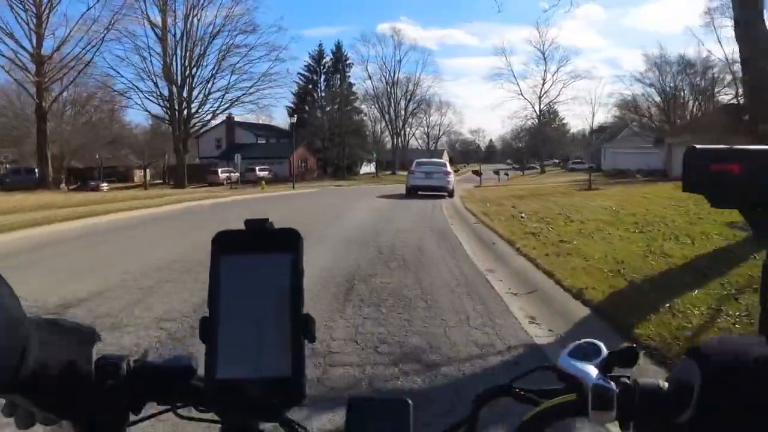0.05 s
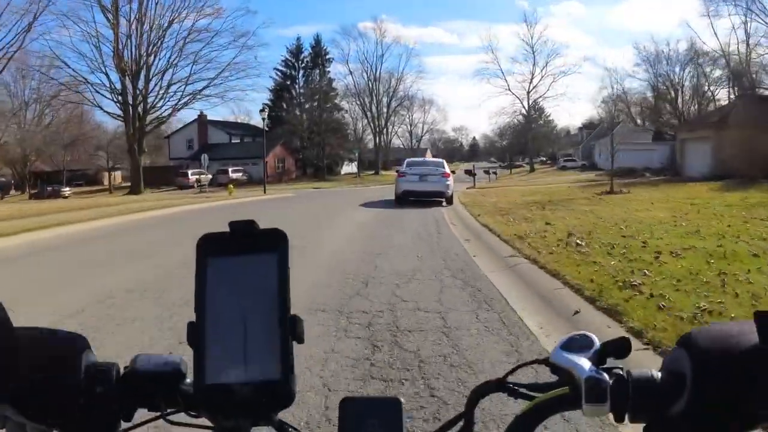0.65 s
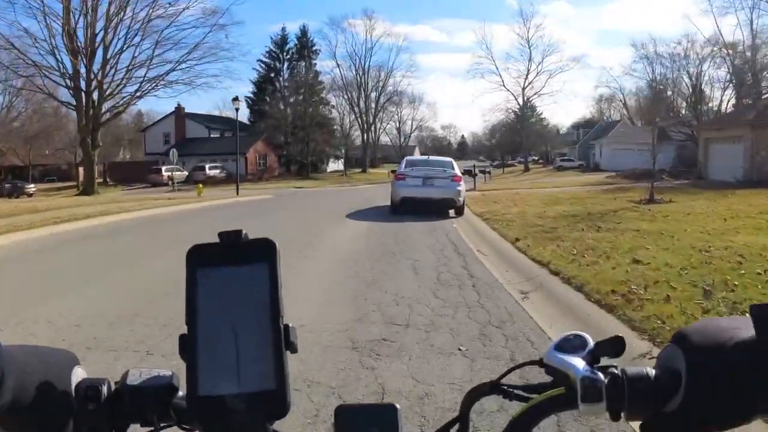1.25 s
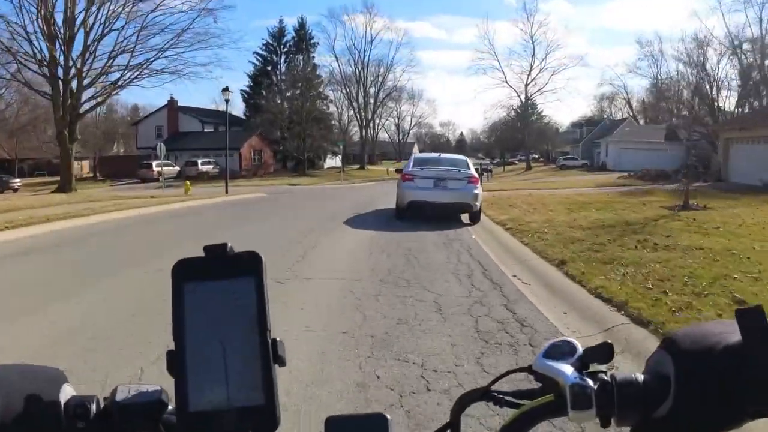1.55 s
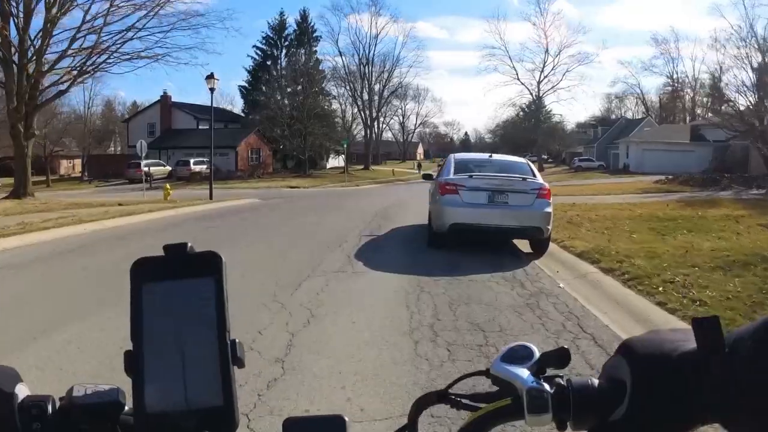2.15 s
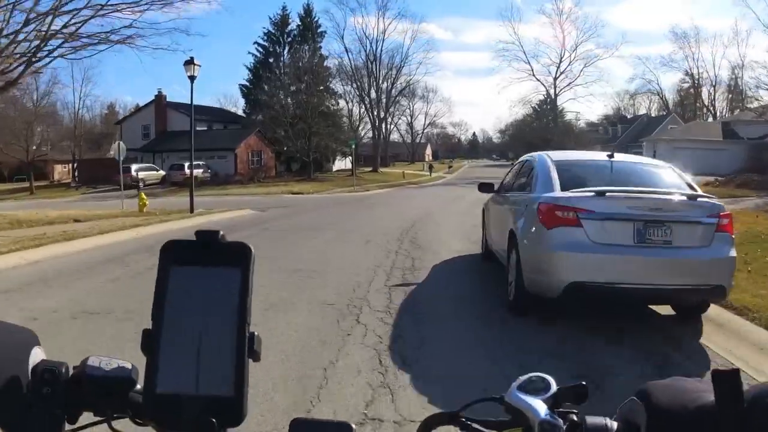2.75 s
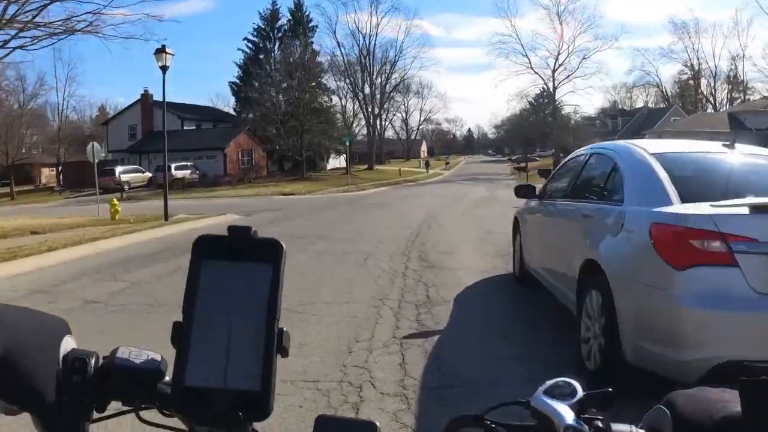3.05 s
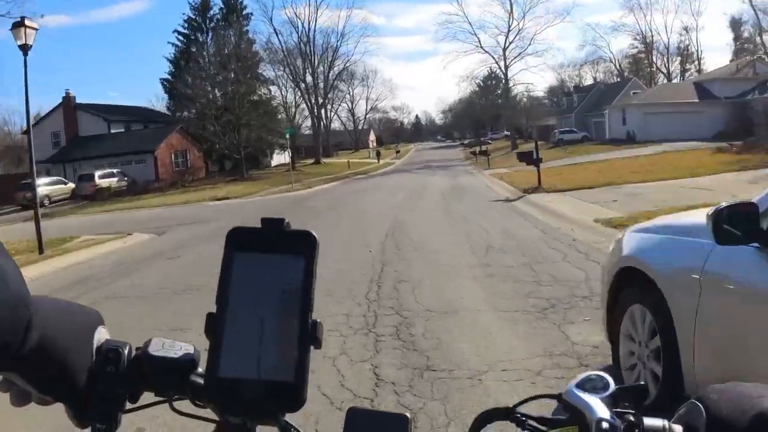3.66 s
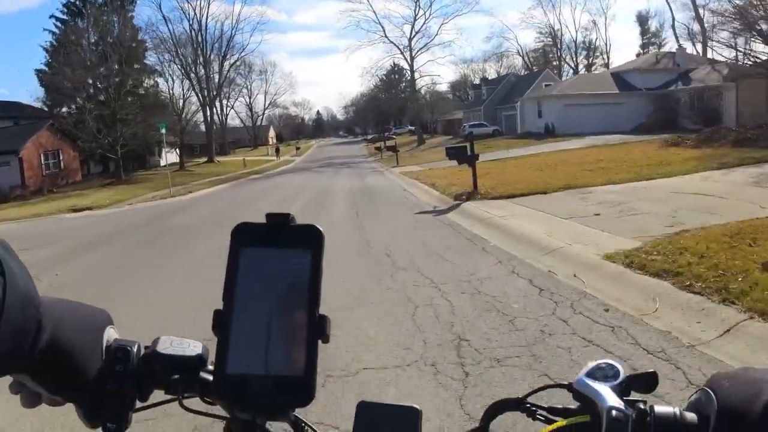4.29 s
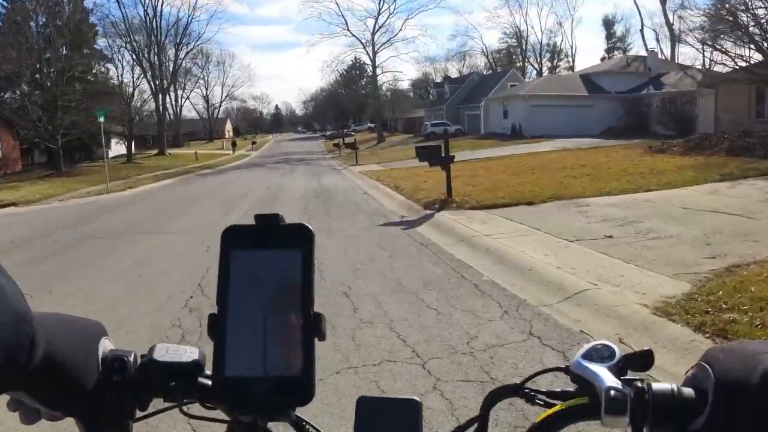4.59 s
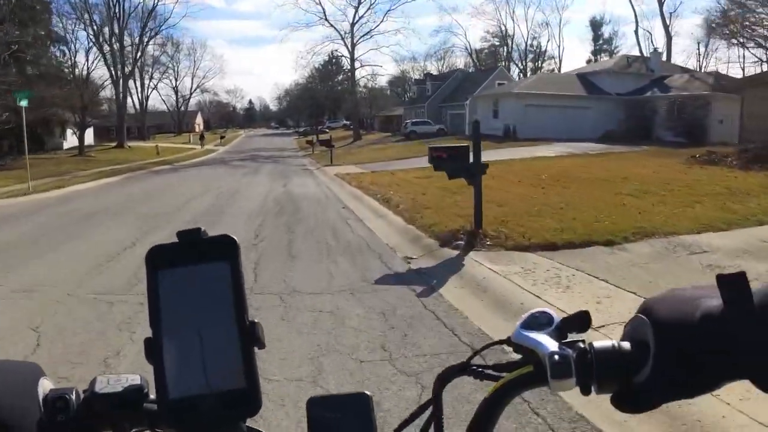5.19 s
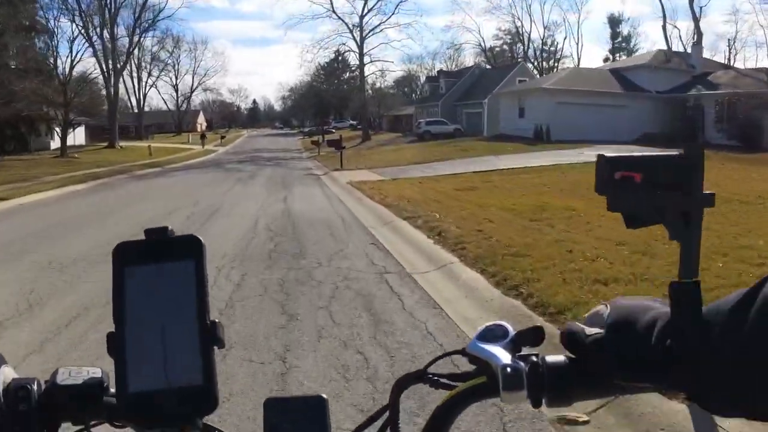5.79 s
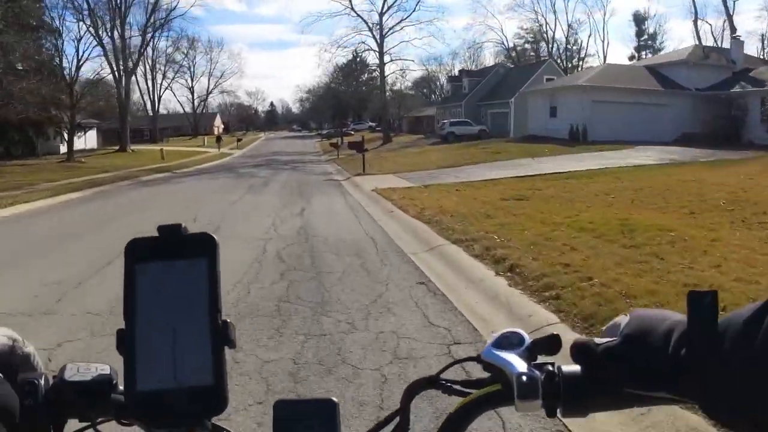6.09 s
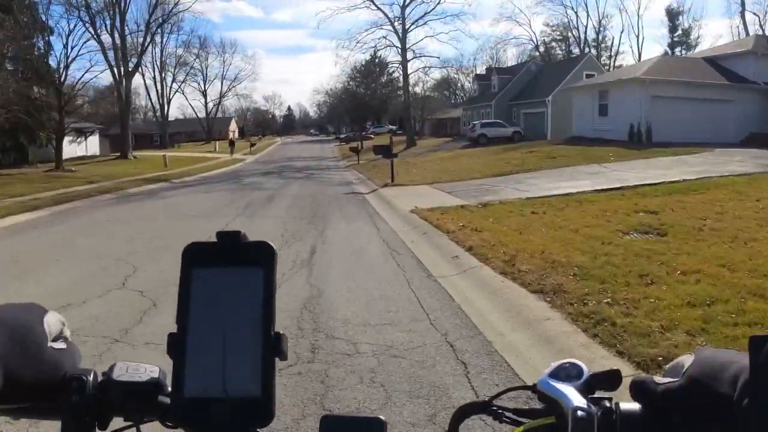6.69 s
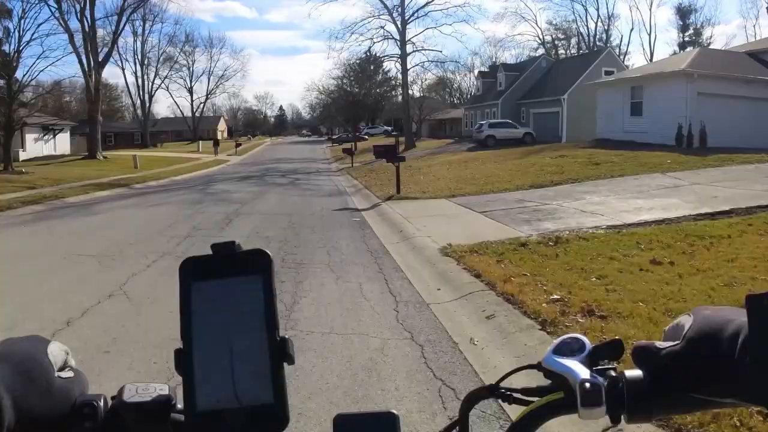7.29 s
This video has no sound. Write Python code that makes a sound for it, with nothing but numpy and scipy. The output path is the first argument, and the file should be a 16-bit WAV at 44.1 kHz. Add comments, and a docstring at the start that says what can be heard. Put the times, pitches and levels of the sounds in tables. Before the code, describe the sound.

An electric bicycle is heard from the rider's position on a street. Throughout, the motor gives a fairly low, throbbing whine that slowly rises in pitch, over steady tyre roar, a faint frame hum and uneven low wind buffeting on the microphone. A thin, very high electronic tone sounds from the start and cuts off at about 1.5 seconds. Between roughly 0.6 and 1.4 seconds the tyres crunch over grit and the fittings rattle, with a quick cluster of knocks near 0.8 seconds. Lighter ticks recur during the rest of the ride. From about 3.3 to 4.2 seconds a soft, bright whoosh swells and fades as tyre noise bounces off a parked car. The strongest gust thumps the microphone near 5.8 seconds. From 6.5 seconds the whine surges in louder pulses, reaching its highest pitch at the end, around 7.3 seconds.

```python
"""Electric bicycle on a street.

Heard from the rider: the drive whines and slowly rises in pitch over tyre roar and wind on the
microphone. The controller sings thinly at first. The tyres crunch over gutter debris, fittings tick,
the frame hums, and a parked car throws the tyre noise back in passing."""
import sys
import numpy as np
from scipy import signal
from scipy.fft import rfft, irfft, next_fast_len
from scipy.io import wavfile
from scipy.ndimage import uniform_filter1d

SR = 44100
rng = np.random.default_rng(int(sys.argv[2]) if len(sys.argv) > 2 else 0)


def inscribe(sig):
    """Save sig as 16-bit PCM at rate SR to the path in sys.argv[1].

    A 1-D sig is mono; a 2-D sig holds one channel per row.
    Samples are clipped to [-1, 1] before scaling.
    """
    pcm = np.round(np.clip(np.atleast_2d(sig).T, -1, 1) * 32767)
    wavfile.write(sys.argv[1], SR, pcm.astype(np.int16))


N = 323687
T = np.arange(N) / SR

# Drive tone, following road speed. Each row: time in seconds, pitch in Hz.
DRIVE_PITCH_HZ = [(0, 239.2), (1.05, 262.5), (1.6, 249.8), (2.5, 242.7), (3.0, 236), (3.6, 244),
                  (4.2, 248.5), (4.7, 249), (5.3, 256.8), (6, 257.8), (6.5, 268.7), (6.95, 268.4),
                  (7.34, 275)]
# Whine, following drive load. Each row: time in seconds, relative level in dB.
WHINE_DB = [(0, -34), (1.05, -38), (1.7, -32.5), (1.95, -38.5), (2.38, -30.5), (2.55, -31.5), (2.75, -30),
            (2.95, -46.5), (3.2, -32), (3.31, -39.5), (3.42, -30), (3.68, -29), (3.8, -36.5), (4.0, -36.5),
            (4.14, -32), (4.3, -29), (4.41, -41), (4.56, -24), (4.68, -29), (4.78, -26.5), (4.97, -37.5),
            (5.2, -32.5), (5.3, -31), (5.6, -31), (5.85, -32.5), (5.97, -27.5), (6.19, -37), (6.31, -34),
            (6.43, -30.5), (6.55, -21), (6.66, -40.5), (6.76, -18.5), (6.85, -37), (6.96, -20), (7.07, -28),
            (7.15, -32.5), (7.28, -23.5), (7.34, -18)]
# Road shake. Each row: time in seconds, roughness from 0 to 1.
ROAD_ROUGHNESS = [(0, 0.85), (.8, 0.73), (2.4, 0.54), (3.5, 0.1), (4.2, 0.29), (5.7, 0.42), (6.5, 0.04),
                  (7.34, 0.22)]
# Drive overtones. Each row: time in seconds, second harmonic in dB, third harmonic in dB.
OVERTONES_DB = [(0, -57, -64), (3.8, -54, -49), (4.6, -46, -62), (5.7, -44, -59), (6.4, -48.5, -46.5),
                (7.34, -46, -53.5)]
# Controller side tones. Each row: frequency in Hz, level in dB.
CONTROLLER_SIDE_TONES = [(11423, -81), (12435, -78), (13447, -76.5), (14460, -82)]
# Sags of the switching tone. Each row: centre in seconds, depth in Hz, half length in seconds.
SWITCH_SAGS = [(.01, 44.5, .025), (.15, 44.4, .02), (.25, 50, .02), (.37, 35, 0.032), (.703, 110, .022),
               (.8, 60, .024), (.895, 65, .028), (.99, 110, .042), (1.1, 85, .024), (1.46, 50, .028)]
# Tyres on asphalt. Each row: time in seconds, roar in dB, hiss in dB.
TYRES_DB = [(0, -35, -49.5), (.8, -32, -47.5), (1.2, -33, -48), (1.95, -38, -51.5), (2.5, -36.5, -49.5),
            (4.0, -35.5, -48.5), (5.2, -36.5, -51), (6.1, -33.5, -49), (7.34, -36.5, -49)]
# Wind on the microphone. Each row: time in seconds, relative buffet and rumble levels in dB.
WIND_DB = [(0, -22, -24.5), (.37, -10, -30), (.6, -17, -22.5), (.8, -21, -23.5), (1.1, -15, -25.5),
           (1.55, -29.5, -28), (1.8, -12, -23.5), (2.0, -19.5, -31.5), (2.52, -22.5, -23),
           (2.75, -18.5, -28.5), (3.7, -24.5, -27), (4.25, -23, -29.5), (5.3, -16.5, -25.5),
           (5.8, -12, -24.5), (6.12, -16, -33), (6.28, -10, -24), (6.55, -21, -36.5), (7.1, -16, -27.5),
           (7.25, -23, -31.5)]
# Blows from the road edge. Each row: start in seconds, level in dB, centre in Hz, decay in seconds,
# bandwidth as a share of the centre, ring in dB relative to the puff.
ROAD_BLOWS = [(0.673, -35.5, 605, 0.018, 1.8, 9), (.754, -30, 816, 0.017, 0.56, -3),
              (0.823, -23.5, 746, 0.0038, 0.28, 5), (0.8258, -31.5, 1390, 0.0024, 0.34, 10.5),
              (.826, -43.5, 1990, 0.0061, 0.21, 7), (0.856, -18, 264, 0.0056, 0.95, 3),
              (0.858, -32.5, 967, 0.011, 0.78, 7.5), (0.872, -24.5, 830, 0.0065, 0.76, -12)]
# Clacks of the fittings. Each row: start in seconds, relative level in dB, centre in Hz, decay in
# seconds, bandwidth as a share of the centre, ring offset in dB.
CLACKS = [(.066, -55, 5570, .004, .5, -14), (.169, -54, 5500, .004, .8, -16),
          (.183, -51, 5700, .003, 0.26, -10), (.276, -52, 5560, 0.0018, .5, -15),
          (.309, -54, 5500, .002, .5, -15), (.319, -51, 5700, .002, .3, -18),
          (.340, -51, 5500, .002, .9, -11), (.391, -52, 5500, .002, .3, -14),
          (.427, -51, 5630, .003, .3, -12), (.512, -48, 3800, .002, .3, -15),
          (.517, -44.5, 4160, .003, 0.68, -23), (.562, -46, 5400, .002, .5, -21),
          (.597, -57, 4500, .002, 1, -16), (.626, -46, 5200, .004, .6, -10),
          (.640, -39, 5340, 0.0028, 1, -9), (.651, -37, 5600, .0016, .4, -18),
          (.666, -45, 4600, .007, 0.73, -13), (.674, -47, 4100, .007, 0.91, -11),
          (.692, -52, 4300, .009, .8, -14), (.722, -48, 5130, .003, .25, -9),
          (0.732, -51, 5400, .0015, .6, -16), (0.767, -41, 5770, 0.0017, 1.4, -13),
          (0.794, -60, 5410, .002, .6, -10), (.805, -59, 5800, .002, .5, -12),
          (.857, -41.5, 5860, 0.017, 1, -6), (0.869, -46, 3720, .005, 0.72, -3),
          (0.881, -49, 6500, .008, .7, -1), (0.896, -49, 3740, .004, 0.88, -11),
          (0.936, -44, 4770, .009, 0.9, -9), (.944, -48, 3800, 0.0074, .7, -6),
          (.965, -50, 5500, .007, .8, -15), (1.003, -46, 5000, .0015, 1, -16),
          (1.027, -36, 5500, 0.00099, 0.88, -20), (1.047, -44, 5500, 0.0012, 0.89, -24),
          (1.201, -40.5, 5730, .0025, .3, -16), (1.233, -49, 5700, .002, .4, -15),
          (1.267, -45, 4200, 0.0014, 1.3, -16), (1.279, -52, 5000, .003, .8, -16),
          (1.315, -54, 5500, .003, .6, -12), (1.357, -44, 5600, .002, 0.33, -17),
          (1.749, -50, 5400, .003, 0.64, -12), (2.121, -52, 5000, 0.0019, 1.07, -16),
          (2.334, -61, 4600, .004, .8, -2), (2.373, -55, 5760, 0.0044, 0.73, -7),
          (2.483, -58, 6000, .002, .9, -16), (2.576, -46, 5700, 0.0016, 0.3, -23),
          (2.591, -51.5, 4660, 0.0035, 1.6, -6), (3.363, -50, 4200, 0.0016, 1.1, -20),
          (3.526, -54, 4500, .002, .7, -13), (3.577, -61.5, 4600, .004, .15, -2.5),
          (3.973, -55, 4900, .003, 0.45, -16), (4.008, -54, 4500, .003, .6, -16),
          (4.193, -49, 5800, 0.002, .5, -17), (4.336, -53, 5500, .002, .9, -18),
          (4.591, -57, 4000, 0.0017, 0.78, -9), (5.829, -57, 4970, .012, 0.81, -16),
          (6.015, -56, 4500, .0071, 1.2, -11), (6.081, -44, 4505, 0.004, 0.97, -15),
          (6.087, -46.5, 6000, .0035, 1.1, -6), (6.355, -49, 3900, 0.0055, 1.3, -23),
          (6.751, -54, 4650, 0.0022, 1.17, -14), (7.087, -51.5, 3980, .0061, 1, -13)]
# Modes of the fittings. Each row: frequency in Hz, decay in seconds, relative level in dB.
FITTING_MODES = [(2175, .009, -2), (3030, 0.0098, -2), (3650, 0.014, 5.5), (3755, 0.011, 10.5),
                 (4080, 0.01, 5.5), (4670, 0.0099, 7.5), (5010, 0.0064, 4), (5320, .006, 5),
                 (5630, 0.0079, -2.5), (6900, 0.009, 5.5), (9100, 0.011, 3)]
# Frame and tyre modes. Each row: frequency in Hz, resonator width in Hz, early, middle and end dB.
BODY_MODES = [(49.9, 3.3, -43, -44.5, -45), (105.7, 10.5, -42, -37, -53.5), (407, 16, -43, -60, -45),
              (603, 26, -47, -54, -62.5), (783, 75, -55, -45, -46), (852, 39, -56, -49.5, -50.5),
              (1380, 340, -52.5, -63.5, -72.5), (3770, 140, -83, -81, -86)]
# Surges beside the car. Each row: centre in seconds, level in dB, half length in seconds.
WHOOSH_SURGES = [(3.546, -47, 0.028), (3.68, -44.5, 0.062), (3.763, -43, .025), (3.872, -43, 0.02),
                 (4.167, -44.5, 0.033)]
# Rasps of the running gear. Each row: start in seconds, length in seconds, level in dB.
GEAR_RASPS = [(2.618, .04, -64), (3.96, 0.065, -62), (4.075, .21, -61)]

# Envelopes. Each row: time in seconds, level in dB.
WIND_BOOM_DB = [(0, -41), (.7, -31), (2.2, -30.5), (4.2, -28.5), (5.3, -32.5), (6.4, -34.5), (7.34, -33)]
GRIT_DB = [(0, -61), (.58, -55), (.68, -48), (.75, -53.5), (.79, -49), (.84, -52), (.9, -47.5),
           (1.0, -56.5), (1.17, -56.5), (1.3, -51), (1.5, -58.5), (1.9, -64.5), (5.4, -63.5), (5.9, -61.5),
           (7.34, -63.5)]
FRAME_HUM_DB = [(0, -45.5), (.35, -45), (.52, -35.5), (.7, -45), (.88, -40), (1.2, -48.5), (1.55, -46),
                (1.8, -41.5), (2.2, -51.5), (2.63, -38), (2.87, -49.5), (3.1, -43.5), (3.4, -46),
                (3.72, -39), (3.93, -44), (4.11, -36.5), (4.35, -46.5), (4.65, -46), (4.87, -42),
                (5.0, -43), (5.17, -42.5), (5.45, -44.5), (5.63, -38), (5.82, -44), (6.2, -45), (6.39, -35),
                (6.55, -45.5), (6.72, -36), (6.9, -43), (7.08, -45), (7.2, -40), (7.34, -49)]

# Noise spectra. Each row: frequency in Hz, relative density in dB.
CONTROLLER_FIZZ_SPECTRUM = [(5000, -15), (10000, -16), (14000, -23), (14750, -10), (14960, -4), (15200, -6),
                            (15450, -6), (15750, -12)]
TYRE_ROAR_SPECTRUM = [(120, -19), (200, -2.5), (295, 7), (345, -1.5), (400, -1.5), (475, -9), (512, -0.5),
                      (545, -1), (595, 2.5), (650, 0), (688, -5), (735, -0.5), (790, 0.5), (865, -1),
                      (922, -6.5), (950, -6.5), (1010, -10), (1070, -10), (1140, -17), (2000, -40.5)]
TYRE_HISS_SPECTRUM = [(600, -3), (1150, -0.5), (1450, 4), (2000, -2.5), (3000, -11.5), (4300, -19),
                      (5200, -23), (7000, -26.5), (7500, -29.5), (11000, -31.5), (15500, -34.5)]
WIND_BUFFET_SPECTRUM = [(1, -5.5), (4, -4), (7, -6.5), (12, -6.5), (20, -10.5), (30, -36), (60, -50.5)]
WIND_BOOM_SPECTRUM = [(12, -29.5), (24, -2), (36, -6), (46, -4), (60, -27)]
WIND_RUMBLE_SPECTRUM = [(30, -25.5), (40, -7.5), (48, -2), (62, -11), (88, -16), (118, -18), (140, -20),
                        (170, -26.5), (300, -31.5), (1000, -73.5)]
GRIT_SPECTRUM = [(700, -9), (1500, 5), (2800, 5), (3800, -0.5), (4500, -5.5), (5400, -1), (7500, -13.5),
                 (11000, -13), (15500, -19)]
CAR_ECHO_SPECTRUM = [(500, -15), (1150, -12), (1300, 7), (1470, 5.5), (1750, -2.5), (2350, -1.5),
                     (3300, -21), (4500, -18), (7200, -32), (7600, -22.5), (8000, -31.5), (12000, -29.5),
                     (15500, -37)]
RASP_SPECTRUM = [(1500, -18), (2800, 3), (3800, 2), (4700, 3), (5200, -4), (5700, -21), (9000, -33)]


def drive(trim_db=-2, waver=0.0048, halo_shift_hz=2, throb_db=4.5):
    """Whine with two weak overtones; road shake smears the tone and makes it throb."""
    phase = phase_rad(curve(DRIVE_PITCH_HZ) * (1 + waver * drift(6.25)))
    rough = curve(ROAD_ROUGHNESS)
    clean = np.sqrt(2 * (1 - rough)) * np.cos(phase)
    halo = np.sqrt(rough) * smeared(phase + 2 * np.pi * halo_shift_hz * T, width_hz=17)
    tone = steadied(clean + halo, 0.089)
    second = amp(curve(OVERTONES_DB)) * smeared(2 * phase, width_hz=6)
    third = amp(curve(OVERTONES_DB, column=2)) * smeared(3 * phase, width_hz=6)
    throb = np.sqrt(rough) * np.tanh(drift(21))
    return amp(curve(WHINE_DB) + trim_db + throb_db * throb) * tone + second + third


def controller(switch_hz=14978, upper_hz=15488, wander_hz=6, jitter_hz=17, flick_hz=90, off_s=1.525):
    """Two switching tones sag together over side tones and fizz, then flick upward; all cuts off."""
    sag_hz = sum(depth_hz * bell(at_s, half_s) for at_s, depth_hz, half_s in SWITCH_SAGS)
    rise_hz = flick_hz * np.exp(np.minimum(T - off_s, 0) / 0.014)
    bend_hz = rise_hz - sag_hz + wander_hz * drift(12) + jitter_hz * drift(150)
    tones = sine(-47.5, switch_hz + bend_hz) + sine(-68, upper_hz + bend_hz)
    sides = sum(sine(db, hz + 14 * drift(40)) for hz, db in CONTROLLER_SIDE_TONES)
    fizz = amp(-64.5) * noise(CONTROLLER_FIZZ_SPECTRUM)
    return (tones + sides + fizz) * np.clip((off_s - T) / 0.01, 0, 1)


def tyres():
    """Tread roar and hiss, fluttering together with the grain of the asphalt."""
    grain_db = drift(42)
    roar = amp(curve(TYRES_DB) + grain_db) * noise(TYRE_ROAR_SPECTRUM)
    hiss = amp(curve(TYRES_DB, column=2) + grain_db) * noise(TYRE_HISS_SPECTRUM)
    return roar + hiss


def wind(gust_s=5.782, gust_hz=8.3, buffet_limit=0.62):
    """Slow pressure swings, boom and lumpy rumble at the microphone; one big eddy pushes, then sucks."""
    eddy = bell(gust_s, half_s=0.076)
    gust = 1.22 * eddy * np.sin(2 * np.pi * gust_hz * (gust_s - T))
    swings = amp(curve(WIND_DB) + 1.5) * steadied(noise(WIND_BUFFET_SPECTRUM), 0.21)
    buffet = (1 - eddy) * buffet_limit * np.tanh(swings / buffet_limit)
    boom = amp(curve(WIND_BOOM_DB)) * steadied(noise(WIND_BOOM_SPECTRUM), 0.65)
    rumble_db = curve(WIND_DB, column=2) - 4 + 2 * np.tanh(drift(9))
    rumble = amp(rumble_db) * steadied(noise(WIND_RUMBLE_SPECTRUM), 0.2)
    return gust + buffet + boom + rumble


def grit(cracks_per_s=5000, spread_db=6, breadth=0.4):
    """Grit and dry leaves under the tyres: tiny cracks of uneven size in eight bands."""
    bands_hz = np.geomspace(900, 13000, 8)
    cracks = np.zeros(N)
    for hz in bands_hz:
        size = amp(spread_db * np.minimum(rng.exponential(1, N), 3.5)) * rng.choice([-1, 1], N)
        hits = rng.random(N) < cracks_per_s / len(bands_hz) / SR
        cracks += resonate(size * hits, hz, hz * breadth)
    return amp(curve(GRIT_DB)) * colour(cracks, GRIT_SPECTRUM)


def bumps(cutoff_hz=2700):
    """Knocks through the tyres, each a puff and a short ring; the rubber absorbs the treble."""
    blows = np.zeros(N)
    for start_s, db, hz, decay_s, breadth, ring_db in ROAD_BLOWS:
        add(blows, start_s, puff(db, hz, decay_s, breadth) + ping(db + ring_db, hz, decay_s))
    return signal.sosfilt(signal.butter(4, cutoff_hz, fs=SR, output="sos"), blows)


def rattles(clack_trim_db=2, gutter_end_s=1.5):
    """Loose fittings: clacks throughout, small dry ticks while the tyres are in the gutter."""
    mix = np.zeros(N)
    for start_s, db, hz, decay_s, breadth, ring_db in CLACKS:
        add(mix, start_s, clack(db + clack_trim_db, hz, decay_s, breadth, ring_db))
    for when, size, pitch in rng.random(size=(18, 3)):
        start_s = when * gutter_end_s
        db = np.interp(start_s, *np.transpose(GRIT_DB)) + 1.5 * min(-np.log(1 - size), 2)
        add(mix, start_s, puff(db, hz=4200 + 2000 * pitch, decay_s=0.0016, breadth=0.23))
    return mix


def clack(db, hz, decay_s, breadth, ring_db, uneven_db=4, detune=0.007, falloff_db_per_octave=32):
    """A crack rings the fitting modes near its pitch; a broad one also knocks in the mount."""
    ring = 0
    for mode_hz, mode_decay_s, mode_db in FITTING_MODES:
        louder, higher = rng.uniform(-1, 1, 2)
        excitation_db = uneven_db * louder - falloff_db_per_octave * abs(np.log2(mode_hz / hz))
        ring += ping(db + ring_db + mode_db + excitation_db, mode_hz * (1 + detune * higher), mode_decay_s)
    mount = breadth ** 2 * puff(db - 7, hz=2500, decay_s=0.006, breadth=0.66)
    return puff(db, hz, decay_s, breadth) + ring + mount


def body(middle_s=2.5):
    """The road keeps frame and tyre modes humming; the strongest frame mode swells and fades."""
    modes = np.zeros(N)
    for hz, width_hz, *levels_db in BODY_MODES:
        level_db = np.interp(T, [0, middle_s, T[-1]], levels_db)
        modes += amp(level_db) * unit_rms(band_noise(hz, width_hz))
    hum = steadied(band_noise(hz=439.5, width_hz=22), 0.18)
    return modes + amp(curve(FRAME_HUM_DB)) * hum


def parked_car(nearest_s=3.81, approach_s=0.52, leave_s=0.38, nearest_db=-46.5, flutter_db=4):
    """The car's flank reflects bright tyre noise, most when alongside; the whoosh surges a few times."""
    away = (T - nearest_s) / np.where(T < nearest_s, approach_s, leave_s)
    level_db = nearest_db - 25.5 * np.log10(1 + away ** 2)
    echo = amp(level_db + flutter_db * np.tanh(drift(30))) * noise(CAR_ECHO_SPECTRUM)
    surges = sum(amp(db) * bell(at_s, half_s) for at_s, db, half_s in WHOOSH_SURGES)
    whoosh = steadied(band_noise(hz=1420, width_hz=420), 0.03)
    return echo + surges * whoosh


def rasps(fade_s=0.01, grain_db=3):
    """Faint grainy scrapes of the running gear; each fades in, holds and fades out."""
    envelope = np.zeros(N)
    for start_s, length_s, db in GEAR_RASPS:
        inside_s = np.minimum(T - start_s, start_s + length_s - T)
        envelope += amp(db) * np.clip(inside_s / fade_s, 0, 1)
    return envelope * amp(grain_db * drift(70)) * noise(RASP_SPECTRUM)


def wheel_chirp(hz=5738, jitter_hz=34, crest_s=3.01):
    """A faint high note that swells once per 36 cycles of the drive tone."""
    turn_rad = phase_rad(curve(DRIVE_PITCH_HZ)) / 36
    swell = np.clip(0.6 + 0.7 * np.cos(turn_rad - np.interp(crest_s, T, turn_rad)), 0, 1)
    level_db = -76.5 + 4.5 * T / T[-1]
    return swell * sine(level_db, hz + jitter_hz * drift(120))


def puff(db, hz, decay_s, breadth, attack_s=0.00038):
    """A sudden, dying band of noise; breadth is width over centre frequency."""
    t = T[:SR // 4]
    width_hz = hz * breadth
    band = steadied(band_noise(hz, width_hz, len(t)), max(0.001, 2 / width_hz))
    return amp(db) * band * np.exp(-t / decay_s) * (1 - np.exp(-t / attack_s))


def ping(db, hz, decay_s):
    """One dying mode."""
    t = T[:SR // 4]
    return amp(db) * np.sin(2 * np.pi * hz * t) * np.exp(-t / decay_s)


def sine(rms_db, hz):
    """A tone along a frequency curve."""
    return amp(rms_db) * np.sqrt(2) * np.sin(phase_rad(hz))


def smeared(phase, width_hz):
    """A tone smeared into narrow noise; rms about 1."""
    return drift(width_hz) * np.cos(phase) + drift(width_hz) * np.sin(phase)


def noise(spectrum):
    """Noise with the given spectrum; rms 1."""
    return colour(rng.standard_normal(N), spectrum)


def band_noise(hz, width_hz, samples=N):
    """White noise through the same resonator twice."""
    return resonate(resonate(rng.standard_normal(samples), hz, width_hz), hz, width_hz)


def drift(rate_hz):
    """Smooth random motion, rolling off above rate_hz; rms 1."""
    spectrum = rfft(rng.standard_normal(4096))
    hz = np.arange(len(spectrum)) * SR / N
    slow = irfft(spectrum * np.exp(-(hz / rate_hz) ** 2) * (hz > 0))
    return unit_rms(np.interp(T, np.linspace(0, N / SR, len(slow)), slow))


def colour(x, spectrum):
    """Filters by (Hz, dB) points; rms 1."""
    size = next_fast_len(len(x))
    hz, db = np.transpose(spectrum)
    bins_hz = np.fft.rfftfreq(size, 1 / SR)
    gain = amp(np.interp(np.log(bins_hz + 1), np.log(hz + 1), db, right=-120))
    return unit_rms(irfft(rfft(x, size) * gain, size)[:len(x)])


def resonate(x, hz, width_hz):
    """Two-pole resonator; peak gain 1."""
    return signal.lfilter(*signal.iirpeak(hz, hz / width_hz, SR), x)


def steadied(x, window_s):
    """Evens out swells slower than the window; rms about 1."""
    size = int(window_s * SR)
    return x / np.sqrt(uniform_filter1d(uniform_filter1d(x ** 2, size), size) + 1e-12)


def curve(rows, column=1):
    """One column of a time table, at every sample."""
    rows = np.asarray(rows)
    return np.interp(T, rows[:, 0], rows[:, column])


def bell(at_s, half_s):
    """Gaussian swell; peak 1."""
    return np.exp(-((T - at_s) / half_s) ** 2)


def phase_rad(hz):
    """Running phase of a frequency curve."""
    return 2 * np.pi * np.cumsum(hz) / SR


def amp(db):
    """Decibels to gain."""
    return 10 ** (np.asarray(db) / 20)


def unit_rms(x):
    """Scales to rms 1."""
    return x / np.sqrt(np.mean(x ** 2) + 1e-20)


def add(mix, start_s, sound):
    """Adds a sound into the mix."""
    part = mix[round(start_s * SR):][:len(sound)]
    part += sound[:len(part)]


def scene():
    """Bicycle, road and wind at one microphone."""
    bicycle = drive() + controller() + wheel_chirp() + body() + rasps() + rattles()
    road = tyres() + parked_car() + grit() + bumps()
    return (bicycle + road + wind())[None]


def record(dry):
    """Clips at full scale, which the strongest gust reaches; then low-passes at 15.8 kHz."""
    lowpass = signal.firwin(1023, 15800, window=("kaiser", 9), fs=SR)
    return signal.oaconvolve(np.clip(dry, -1, 1), lowpass[None], "same")


dry = scene()
out = record(dry)
inscribe(out)
```